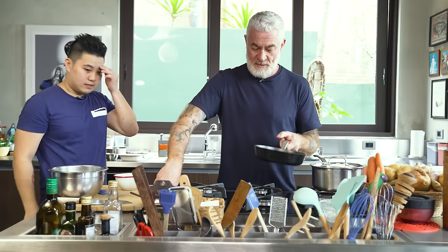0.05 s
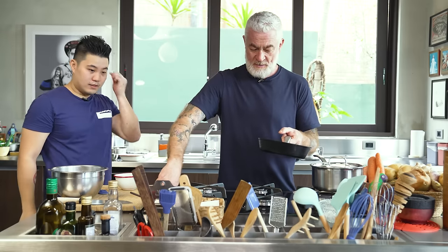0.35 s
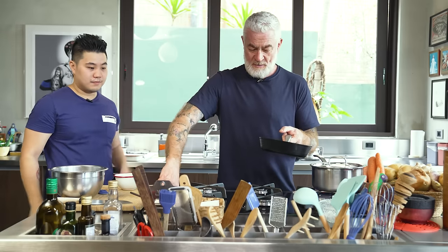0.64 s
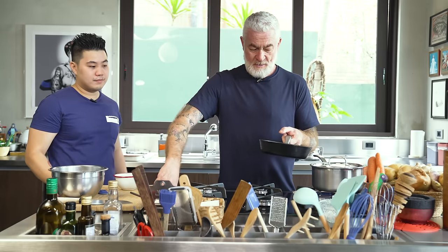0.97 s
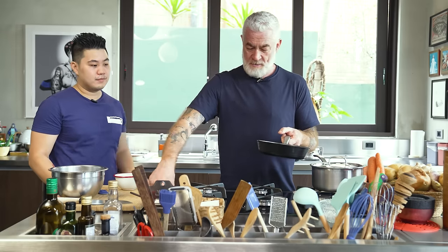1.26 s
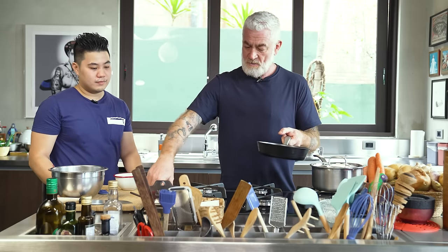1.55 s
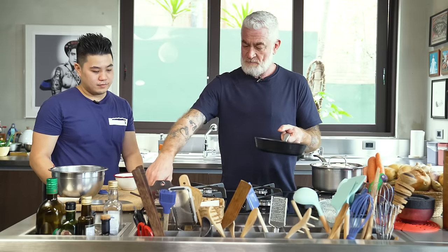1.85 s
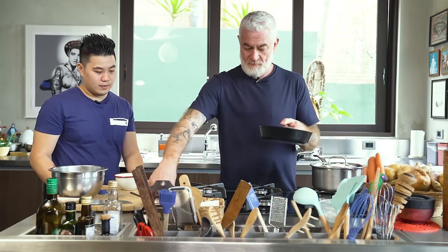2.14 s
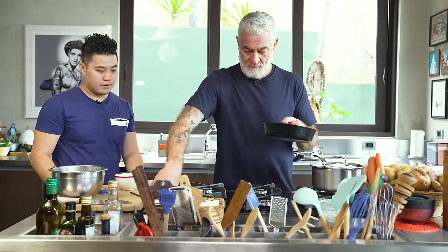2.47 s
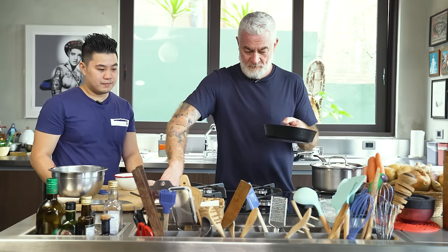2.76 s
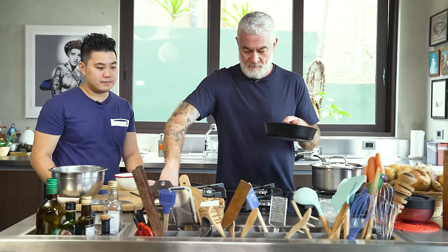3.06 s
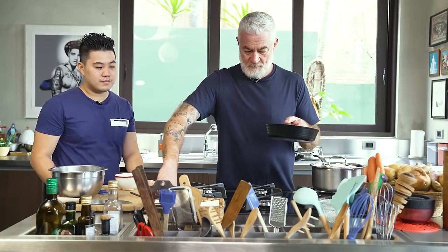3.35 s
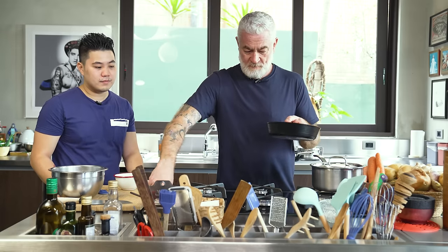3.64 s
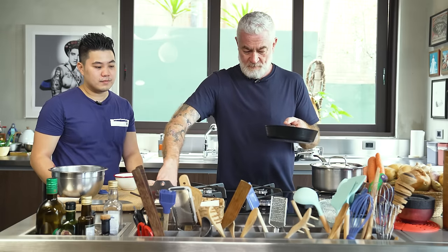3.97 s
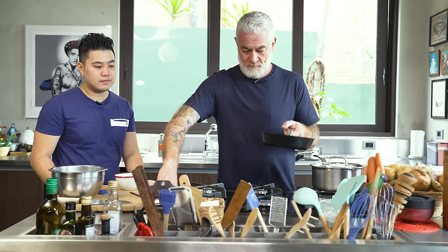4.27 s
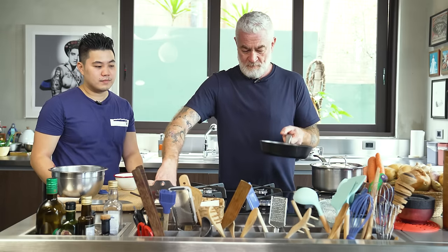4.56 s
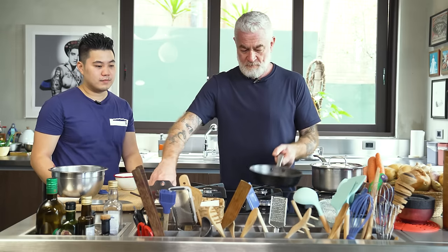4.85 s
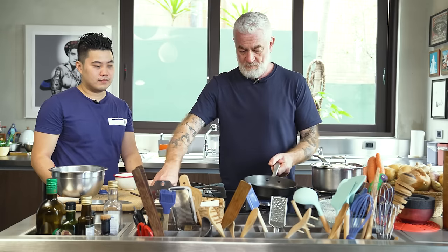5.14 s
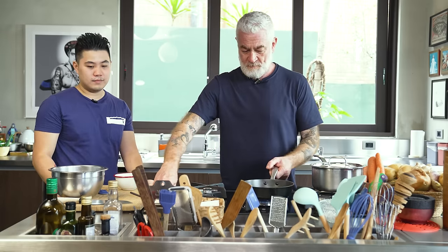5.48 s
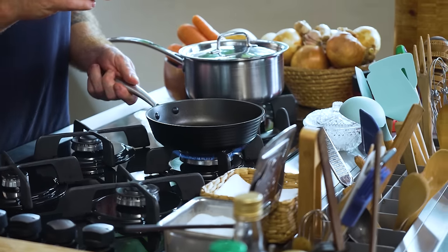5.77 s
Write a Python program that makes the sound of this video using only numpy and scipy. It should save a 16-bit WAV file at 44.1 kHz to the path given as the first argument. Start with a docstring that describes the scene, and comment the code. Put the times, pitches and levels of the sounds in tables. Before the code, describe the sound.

Bright electric snaps rattle from a gas stove igniter, heard from nearby with a short kitchen echo and a quiet appliance hum. A burner lights with a low thump. After a few more sparks and a pause come a knob click, a thin gas whistle and further sparking, during which gas catches again. An iron pan then touches the grate twice and drops with a ringing clank, followed by a soft rush of flame.

```python
"""Lighting a gas hob

An igniter ticks in short bursts of paired sparks, close up in a hard-walled kitchen. Every spark jumps
at all burners at once, so each tick is a cluster of snaps with a bright room tail. The gas catches twice
with a dull thump; between bursts the knob clicks and the jet whistles thinly. An iron frying pan lands
on the grate and the flame rushes briefly under it, all over a bed of ventilation and appliance hum."""
import sys
import numpy as np
from scipy import signal
from scipy.fft import rfft, irfft
from scipy.io import wavfile

SR = 44100
rng = np.random.default_rng(int(sys.argv[2]) if len(sys.argv) > 2 else 0)


def unload_wav(signal):
    """Save mono or channel-first audio to the path in sys.argv[1] as 16-bit WAV at rate SR, clipped to [-1, 1]."""
    wavfile.write(
        sys.argv[1],
        SR,
        np.round(np.clip(np.atleast_2d(signal).T, -1, 1) * 32767).astype(np.int16),
    )


N = 260675
LEAD = SR // 2      # pre-roll, so earlier sound still rings at time zero
TIME = np.arange(-LEAD, N) / SR

# igniter bursts: (start [s], sparks [count], pair period [s], near level [dB], far level [dB])
SPARK_BURSTS = [(-0.0117, 4, .0832, 1.8, .8), (0.1491, 1, .0832, 0.3, 1.8), (0.3075, 8, .0828, 1.7, .8),
                (1.0735, 3, .083, .5, -1.5), (2.7573, 10, .08345, 2.4, -.1), (3.5763, 14, .0832, 2.1, -.5)]
# paths from the near and far electrodes, and off the walls: (delay [s], gain [dB])
NEAR_PATHS = [(0, -4.5), (.00031, -16.5), (.00061, -11), (.00091, -7.5), (.00121, -11)]
FAR_PATHS = [(.0019, -10), (.0033, -4), (.0043, -3.5), (.0054, -7.5)]
WALL_ECHOES = [(0.0134, -20), (0.018, -22.5), (0.0203, -15)]
# tone of a spark nearby, farther off and in the room: (frequency [Hz], gain [dB])
NEAR_SNAP_EQ = [(200, -37.5), (1300, -25), (1650, -10), (2300, -8.5), (3300, -7), (5000, -12), (6800, -13),
                (8100, 7), (9000, -2), (9800, 2), (11500, -3.5), (13000, -5.5), (16000, -9.5)]
FAR_SNAP_EQ = [(200, -30), (1200, -25), (2000, -12), (3300, -7.5), (5000, -8.5), (6500, -4), (8300, 1.5),
               (10500, 2.5), (13000, -5), (16000, -20)]
ROOM_SNAP_EQ = [(200, -30.5), (1200, -27), (1800, -20.5), (3300, -13.5), (5200, -11), (7000, -5), (8400, 0),
                (10300, -1.5), (12500, -7), (16000, -15.5)]
# brief ring of the burner caps: (frequency [Hz], gain [dB], t60 [s])
CAP_MODES = [(1673, -45.5, .04), (2382, -41.5, 0.037), (2945, -37, 0.027), (3236, -38, 0.026),
             (4270, -41.5, 0.019), (4800, -38, 0.012), (7960, -27.5, 0.017), (8720, -29, 0.043),
             (9200, -30, 0.037), (10700, -34, .04)]
# reverb time of the kitchen: (frequency [Hz], t60 [s])
KITCHEN_T60 = [(150, 0.47), (1500, 0.46), (4000, 0.4), (8500, 0.4), (11500, 0.39), (13000, .27),
               (16000, .22)]
# tone of the ventilation: (frequency [Hz], gain [dB])
VENTILATION_EQ = [(15, -44), (25, -26), (40, -19.5), (55, -2), (72, -14), (90, -10.5), (164, -14),
                  (188, -10), (297, -12.5), (322, -17.5), (433, -15.5), (469, -18.5), (826, -14.5),
                  (2560, -30.5), (3930, -35.5), (6210, -38), (15500, -42)]
# appliance hum: (frequency [Hz], rms level [dB])
HUM_TONES = [(59.6, -62.5), (162, -67.5), (297, -68), (436, -71.5), (818, -72.5)]
# gas catching: (time [s], rumble energy [dB], boom energy [dB], boom pitch [Hz], rise [s], t60 [s])
GAS_THUMPS = [(0.661, 1.5, -12.5, 124.4, 0.013, 0.21), (3.629, -16.5, -13.5, 127, .02, 0.31)]
# tone of its rumble: (frequency [Hz], gain [dB])
RUMBLE_EQ = [(25, -28), (45, -14), (65, -2), (130, -4.5), (220, -9), (330, -14.5), (480, -15.5),
             (800, -21.5), (1400, -32.5), (4000, -62)]
# tiny sharp ticks: (time [s], energy [dB], pitch [Hz], t60 [s])
TINY_TICKS = [(0.9743, -11.5, 9100, 0.0016), (1.4625, -41, 10900, 0.0019), (2.2076, -29.5, 6030, 0.0021),
              (2.3652, -21.5, 7900, .0007), (2.4558, -30.5, 8500, .003), (2.4566, -29.5, 3970, .008)]
# clicks of the gas knob: (time [s], energy [dB])
KNOB_CLICKS = [(2.3352, -17), (2.3372, -11.5)]
# the knob's hollow body: (frequency [Hz], gain [dB], t60 [s])
KNOB_MODES = [(1880, -3, 0.0069), (2180, -6, 0.013), (2490, 1.5, 0.0078), (3100, 0.5, 0.0029),
              (5200, -15, 0.0026)]
# swell of the gas jet: (start [s], rise [s], hold [s], fall [s], rms level [dB])
JET_SWELL = (2.36, 0.3, 0.45, 0, -70.5)
# pan meeting grate: (time [s], pan ring [dB], grate clank [dB], hob-top clunk [dB],
# contact brightness [Hz], ring length [x modal t60])
PAN_HITS = [(5.2254, -33.5, -7, -13, 2500, 1.22), (5.3027, -40, -9, -16.5, 5000, 0.76),
            (5.4111, -33, 1.5, 4.5, 9000, 0.8), (5.4188, -28, -10, -5.5, 12000, 0.57),
            (5.424, -33, -2.5, -1, 3960, 0.67)]
# ring of the pan: (frequency [Hz], gain [dB], t60 [s], split of the mode pair [Hz])
PAN_MODES = [(754, -13, .18, 7.6), (808, -16.5, 0.22, 4.7), (876, -10.5, 0.52, 10.4), (927, -8.5, 0.13, 11),
             (1096, 3.5, 0.31, 3.3), (1440, -10, 0.17, 14), (1670, -17, 0.1, 14), (2068, 2, 0.31, 19.8),
             (3206, 0.5, 0.41, 1.8), (4140, -16, 0.26, 72), (4290, -17, 0.19, 50), (4851, -1, 0.16, 54),
             (5550, -10, 0.14, 44), (6705, -8.5, 0.12, 91), (7150, -17, 0.13, 54), (7880, -31, .15, 350),
             (8670, -20, 0.18, 55), (9006, -23, 0.19, 90), (9771, -33, 0.14, 110), (10470, -25, .16, 140),
             (11650, -21, .14, 250)]
# tone of iron on iron, and of the sheet-metal hob top: (frequency [Hz], gain [dB])
CLANK_EQ = [(200, -38), (560, -16.5), (800, 0), (1080, 0), (1200, -17), (1330, -17), (1450, -5), (1700, -7),
            (2200, -12.5), (3000, -23), (5000, -32), (9000, -33), (15000, -45)]
HOB_EQ = [(50, -47), (110, 5.5), (190, 1.5), (260, -3), (400, 3.5), (600, -10), (950, 0.5), (1100, -4),
          (1220, -17), (1350, -14), (1750, -3), (3000, -27.5), (9000, -18.5), (15000, -42)]
# swell of the flame under the pan: (start [s], rise [s], hold [s], fall [s], rms level [dB])
FLAME_SWELL = (5.5, 0.07, .08, .35, -51.5)
# tone of the flame: (frequency [Hz], gain [dB])
FLAME_EQ = [(25, 7), (50, -4.5), (120, -2.5), (300, -16.5), (800, -14.5), (1400, -9), (3000, -24),
            (5000, -30), (9000, -29.5), (15000, -37)]


def from_db(db):
    """Decibels to gain."""
    return 10 ** (np.asarray(db) / 20)


def unit_energy(x):
    """Scaled so that the squares sum to one."""
    return x / np.sqrt(np.sum(x ** 2) + 1e-20)


def at_hz(points, hz):
    """Reads a curve on a log-frequency axis."""
    frequencies, values = np.transpose(points)
    return np.interp(np.log(np.maximum(hz, 1)), np.log(frequencies), values)


def through(x, response):
    """Plays x through an impulse response."""
    return signal.oaconvolve(x, response)[:len(x)]


def equalise(x, curve, size=4096):
    """Minimum-phase EQ of unit energy: shapes the tone with no pre-ring."""
    gain = from_db(at_hz(curve, np.fft.rfftfreq(size, 1 / SR)))
    cepstrum = irfft(np.log(gain))
    cepstrum[1:size // 2] *= 2
    cepstrum[size // 2 + 1:] = 0
    return through(x, unit_energy(irfft(np.exp(rfft(cepstrum)))))


def clicks(times, db):
    """Single-sample impulses on the timeline."""
    at = np.round(np.atleast_1d(times) * SR).astype(int) + LEAD
    return np.bincount(np.clip(at, 0, len(TIME) - 1), np.atleast_1d(from_db(db)), len(TIME))


def decay(t, t60):
    """Exponential fade, 60 dB down at t60."""
    return np.exp(-np.log(1000) * t / t60)


def envelope(start, rise, hold, fall, db):
    """Fades in, holds at its level and fades out."""
    return from_db(db) * np.interp(TIME, start + np.cumsum([0, rise, hold, fall]), [0, 1, 1, 0])


def ring(x, hz, t60):
    """Resonator: a unit click sets a sine of height 1 ringing."""
    radius, angle = from_db(-60 / (t60 * SR)), 2 * np.pi * hz / SR
    return signal.lfilter([0, np.sin(angle)], [1, -2 * radius * np.cos(angle), radius ** 2], x + 1e-18)


def scatter(t60):
    """Dense reflections or modes dying away; unit energy."""
    t = np.arange(SR // 2) / SR
    return unit_energy(rng.standard_normal(len(t)) * decay(t, t60))


def kitchen(x, onset_s=0.0044, bands=12, top_hz=16400):
    """Diffuse room tail: it sets in after the first reflections and dies sooner in the treble."""
    t = np.arange(SR // 2) / SR
    hz, white = np.fft.rfftfreq(len(t), 1 / SR), rfft(rng.standard_normal(len(t)))
    centres, tail = np.linspace(0, top_hz, bands), 0
    for centre, share in zip(centres, np.eye(bands)):
        band = irfft(white * np.interp(hz, centres, share), len(t))
        tail += band * decay(t, at_hz(KITCHEN_T60, centre))
    fade_in = np.clip(2 * t / onset_s - 1, 0, 1)
    return through(x, unit_energy(tail * fade_in))


def spark_rhythm(pair_gap_s=.0359):
    """The igniter limps along in evenly spaced pairs: (time [s], near level [dB], far level [dB])."""
    return [(start + k // 2 * period + k % 2 * pair_gap_s, near_db, far_db)
            for start, count, period, near_db, far_db in SPARK_BURSTS for k in range(count)]


def igniter(near_gain_db=2.5, room_db=-6.0, grate_t60=0.0046, burners=3):
    """Each arc wanders a little, so the snaps of the burners add up differently on every tick."""
    times, near_db, far_db = np.transpose(spark_rhythm())

    def arcs(delay, db):
        wander_s, wander_db = (rng.standard_normal((len(times), 2)) * [1.5e-5, .8]).T
        return clicks(times + delay + wander_s, db + wander_db)

    near = sum(arcs(delay, near_db + db) for delay, db in NEAR_PATHS)
    # window and walls send the whole near cluster back
    near += sum(from_db(db) * np.roll(near, round(delay * SR)) for delay, db in WALL_ECHOES)
    # grates and pots smear the snaps of the far burners
    far = sum(through(arcs(delay, far_db + db), scatter(grate_t60)) for delay, db in FAR_PATHS)
    # the arc lands on a different spot of the cap each time
    caps = sum(from_db(db) * ring(arcs(0, near_db + 2 * rng.standard_normal(len(times))), hz, t60)
               for hz, db, t60 in CAP_MODES)
    # each burner excites the room from its own place
    room = sum(kitchen(arcs(0, (near_db + near_db.mean()) / 2), onset_s=.007) for _ in range(burners))
    snaps = from_db(near_gain_db) * equalise(near, NEAR_SNAP_EQ) + equalise(far, FAR_SNAP_EQ)
    return snaps + caps + from_db(room_db) * equalise(room, ROOM_SNAP_EQ)


def room_tone(ventilation_db=-56.53):
    """A steady bed of ventilation noise and appliance hum."""
    air = from_db(ventilation_db) * equalise(rng.standard_normal(len(TIME)), VENTILATION_EQ)
    hum = sum(np.sqrt(2) * from_db(db) * np.sin(2 * np.pi * (hz * TIME + rng.random()))
              for hz, db in HUM_TONES)
    return air + hum


def gas_thumps():
    """The gas catches with a soft thump that swells and dies away: a boom inside a rumble."""
    rumble = equalise(rng.standard_normal(len(TIME)), RUMBLE_EQ)
    thumps = 0
    for time, rumble_db, boom_db, boom_hz, rise, t60 in GAS_THUMPS:
        t = TIME - time
        swell = np.exp(np.minimum(t / rise, -np.log(1000) * t / t60))
        boom = np.sin(2 * np.pi * boom_hz * t)
        thumps += from_db(rumble_db) * unit_energy(rumble * swell)
        thumps += from_db(boom_db) * unit_energy(boom * swell)
    return thumps


def ticks_and_knob(tick_room_db=-9.0, knob_room_db=-7.0):
    """A few tiny sharp ticks and the click of the knob's hollow body, with their room tail."""
    bass_cut = np.array([1, -2, 1])   # tiny parts radiate no bass
    ticks, knob = 0, 0
    for time, db, hz, t60 in TINY_TICKS:
        ping = ring(clicks(time, 0), hz, t60)
        ticks += from_db(db) * unit_energy(through(ping, bass_cut))
    for time, click_db in KNOB_CLICKS:
        body = sum((-1) ** k * from_db(db) * ring(clicks(time, 0), hz, t60)
                   for k, (hz, db, t60) in enumerate(KNOB_MODES))
        knob += from_db(click_db) * unit_energy(body)
    return ticks + knob + kitchen(from_db(tick_room_db) * ticks + from_db(knob_room_db) * knob)


def gas_jet(whistle_hz=3950, t60=0.014):
    """Gas whistles thinly through the nozzle: noise in one narrow resonance."""
    whistle = ring(rng.standard_normal(len(TIME)), whistle_hz, t60)
    return envelope(*JET_SWELL) * whistle / whistle.std()


def pan_ring(length, twin_db=-8.0):
    """One blow on the round pan: the handle splits each mode into a beating pair."""
    t = np.arange(SR) / SR
    modes = 0
    for k, (hz, db, t60, split) in enumerate(PAN_MODES):
        pair = np.sin(2 * np.pi * hz * t) + from_db(twin_db) * np.sin(2 * np.pi * (hz + split) * t)
        # neighbouring modes start in opposite directions
        modes += (-1) ** k * from_db(db) * decay(t, t60 * length) * pair
    return modes


def pan_on_grate(clank_t60=0.036, hob_t60=0.34, knock_db=-1.0, room_db=-5.5):
    """The pan touches twice, drops and rocks; it rings, the grate clanks and the hob top shakes."""
    rings, clanks, clunks = 0, 0, 0
    for time, ring_db, clank_db, clunk_db, contact_hz, length in PAN_HITS:
        softness = np.exp(-2 * np.pi * contact_hz / SR)   # a longer contact is duller
        blow = signal.lfilter([1 - softness], [1, -softness], clicks(time, 0) + 1e-18)
        rings += from_db(ring_db) * through(blow, pan_ring(length))
        clanks += from_db(clank_db) * blow
        clunks += from_db(clunk_db) * blow
    grate = equalise(through(clanks, scatter(clank_t60)) + from_db(knock_db) * clanks, CLANK_EQ)
    hob = equalise(through(clunks, scatter(hob_t60)), HOB_EQ)
    return rings + grate + hob + kitchen(from_db(room_db) * (rings + grate))


def flame():
    """A brief, soft rush of flame once the pan sits over it."""
    return envelope(*FLAME_SWELL) * equalise(rng.standard_normal(len(TIME)), FLAME_EQ)


def scene():
    """All layers in mono, with the pre-roll trimmed off."""
    mix = igniter() + ticks_and_knob() + gas_jet() + gas_thumps() + pan_on_grate() + room_tone() + flame()
    return mix[None, LEAD:]


def record(dry, ceiling=.36, lowpass_hz=15800):
    """A soft clip rounds the sharpest peaks; a steep low-pass takes off the very top."""
    rounded = dry / (1 + (dry / ceiling) ** 4) ** (1 / 4)
    return signal.sosfilt(signal.ellip(8, .1, 70, lowpass_hz, fs=SR, output="sos"), rounded)


dry = scene()
out = record(dry)
unload_wav(out)
```